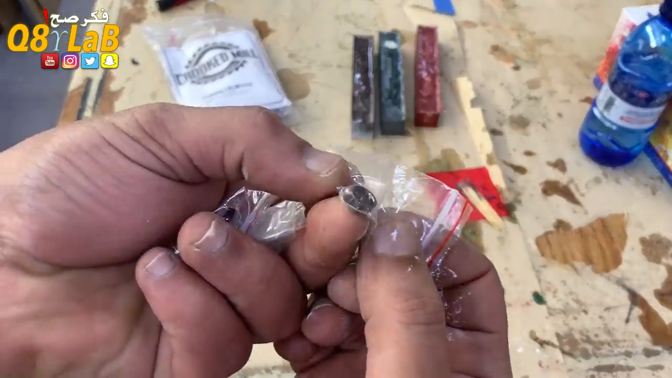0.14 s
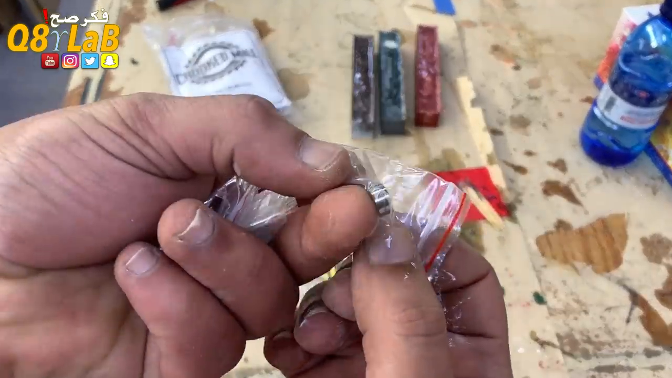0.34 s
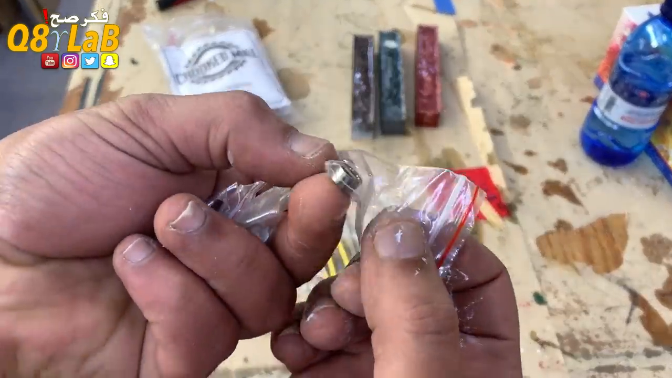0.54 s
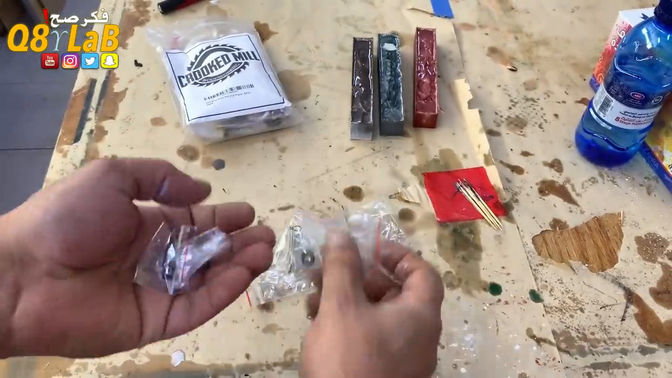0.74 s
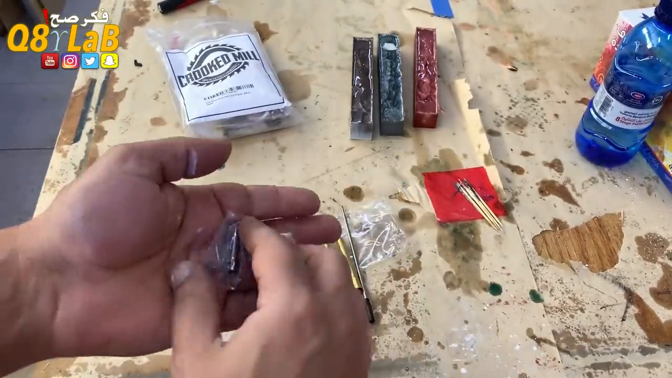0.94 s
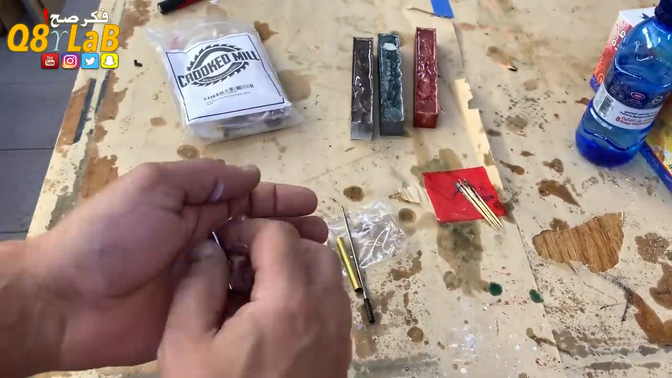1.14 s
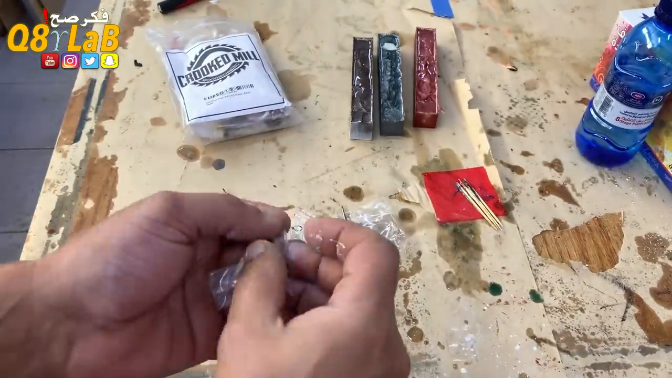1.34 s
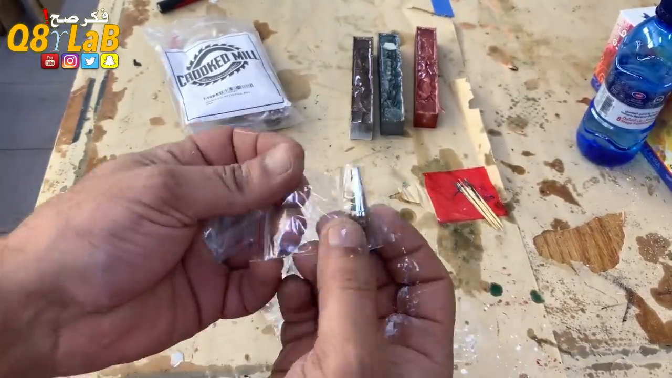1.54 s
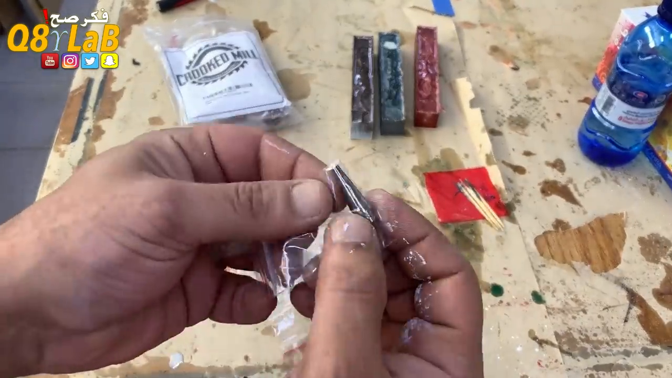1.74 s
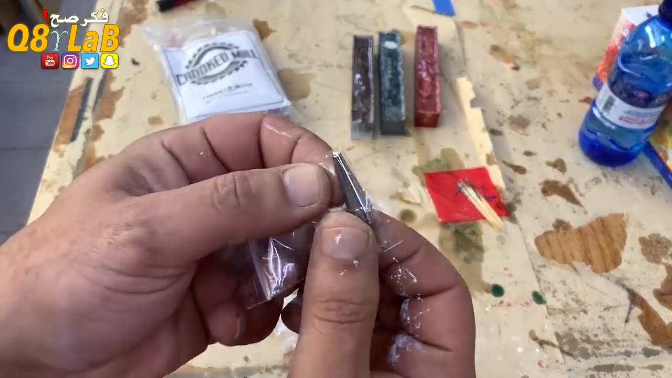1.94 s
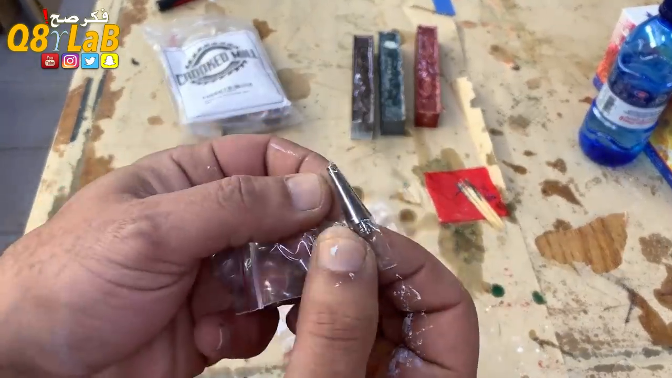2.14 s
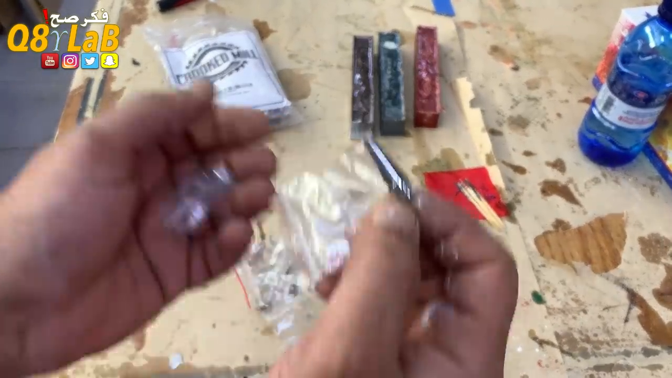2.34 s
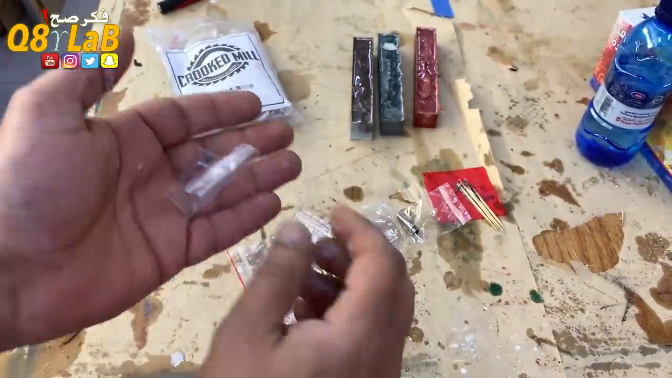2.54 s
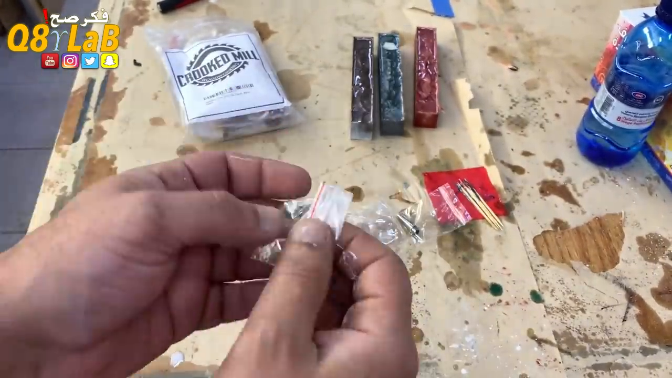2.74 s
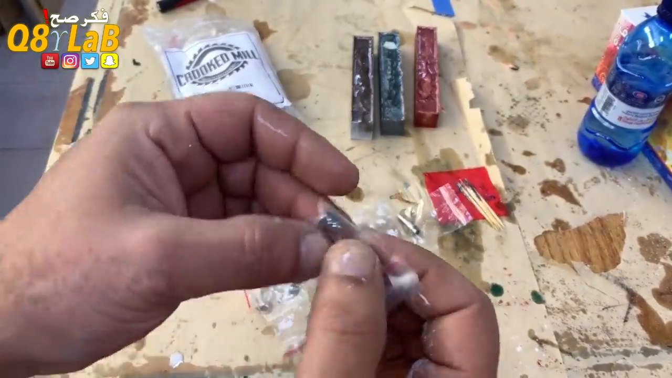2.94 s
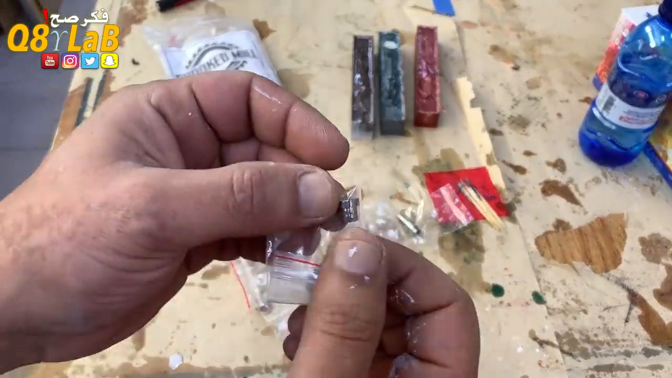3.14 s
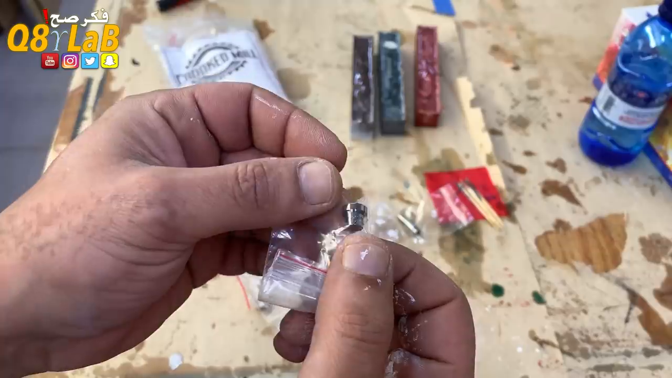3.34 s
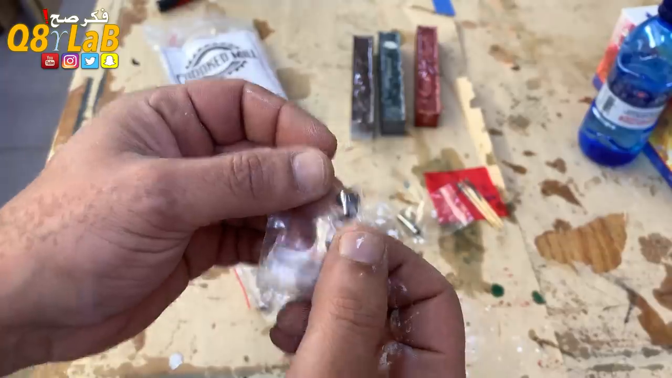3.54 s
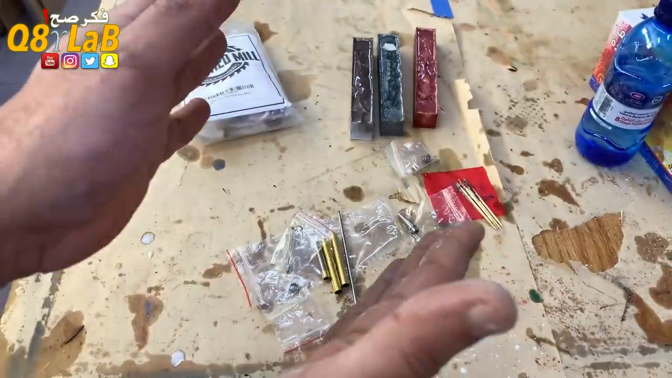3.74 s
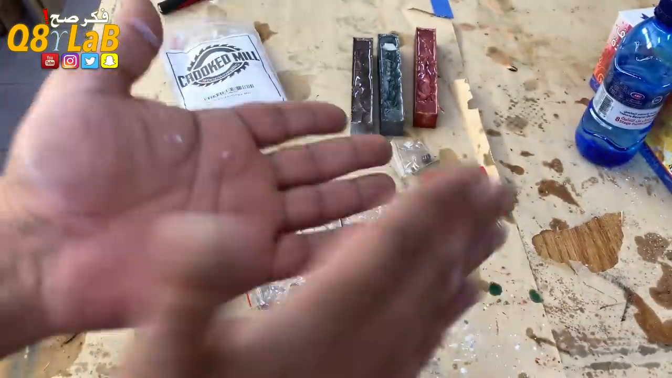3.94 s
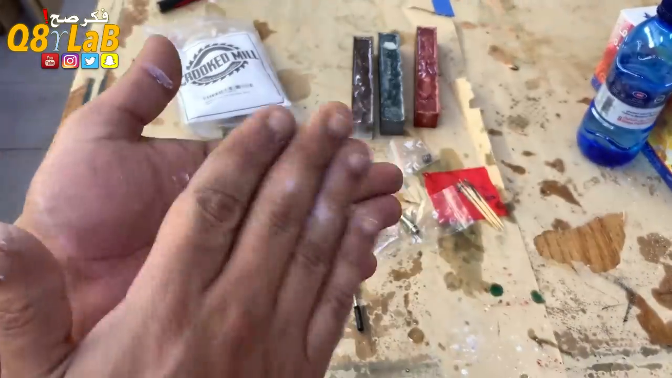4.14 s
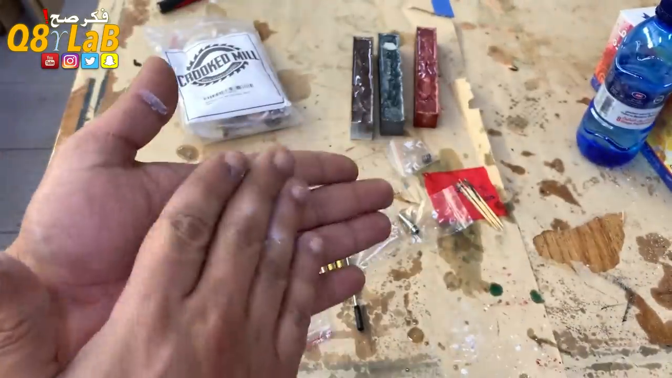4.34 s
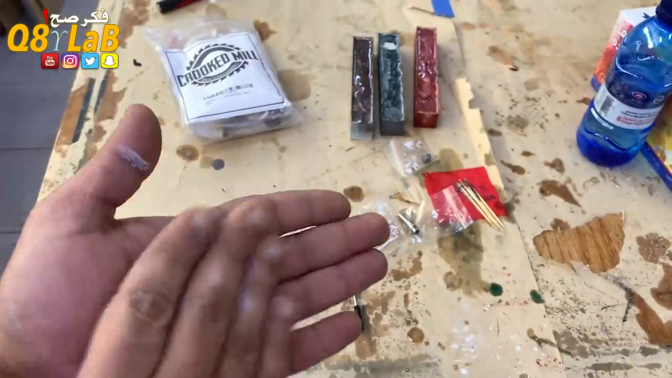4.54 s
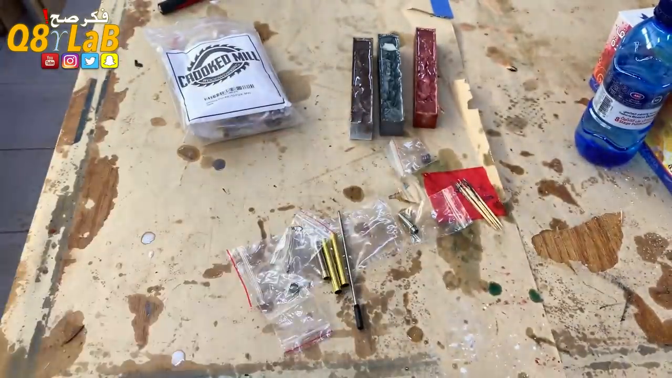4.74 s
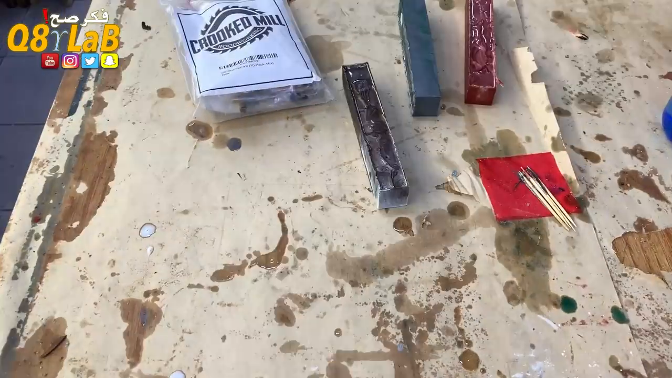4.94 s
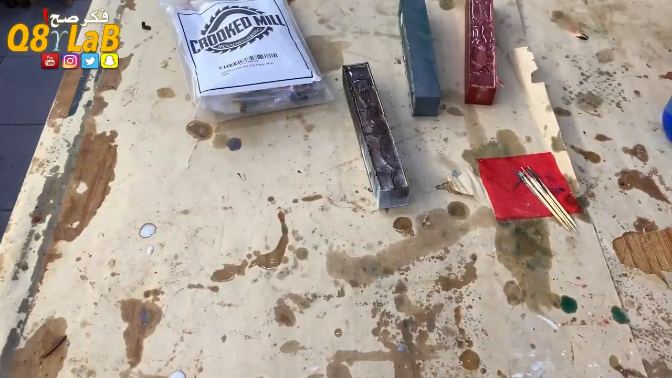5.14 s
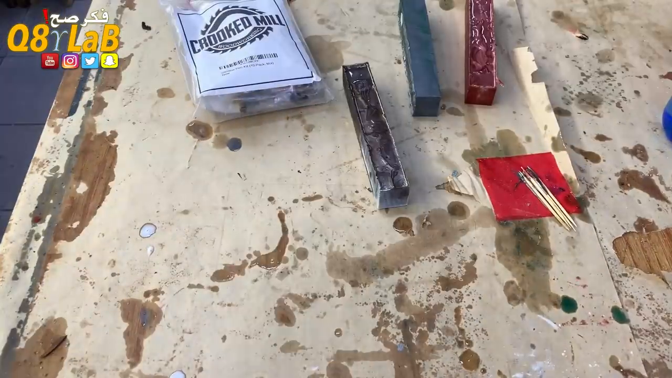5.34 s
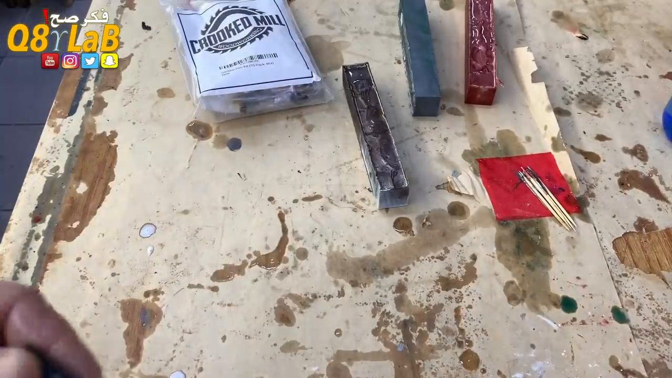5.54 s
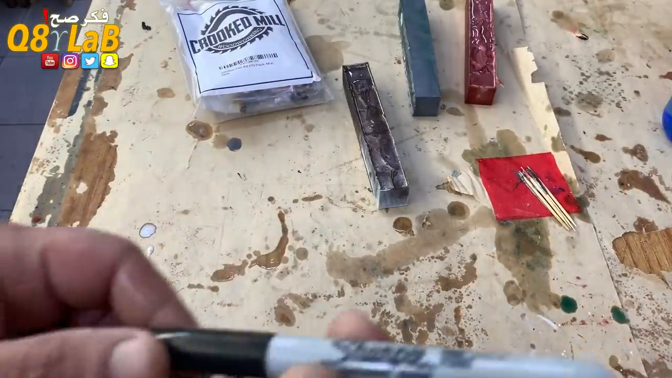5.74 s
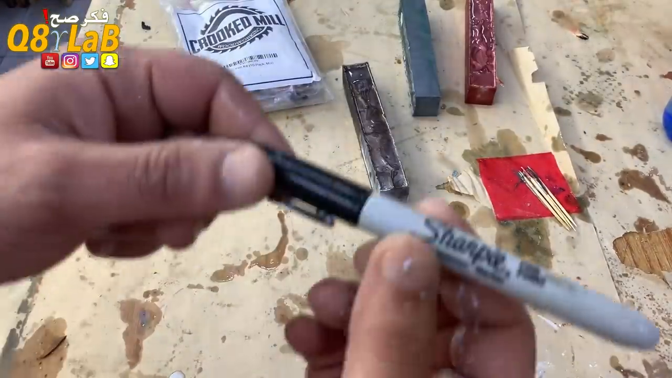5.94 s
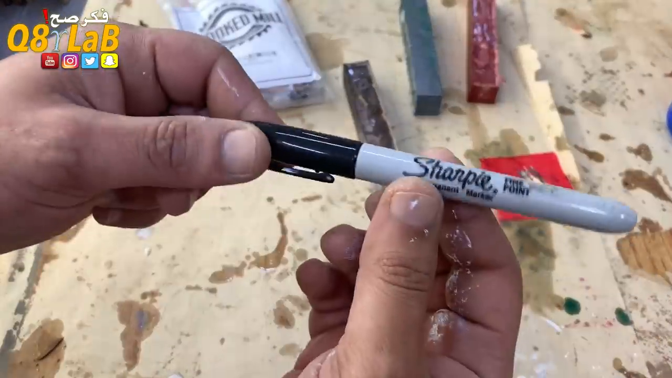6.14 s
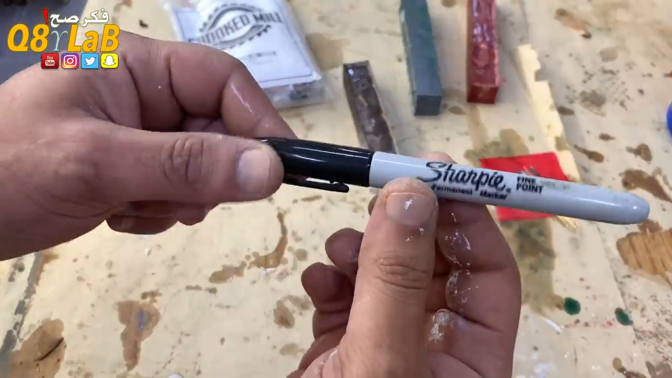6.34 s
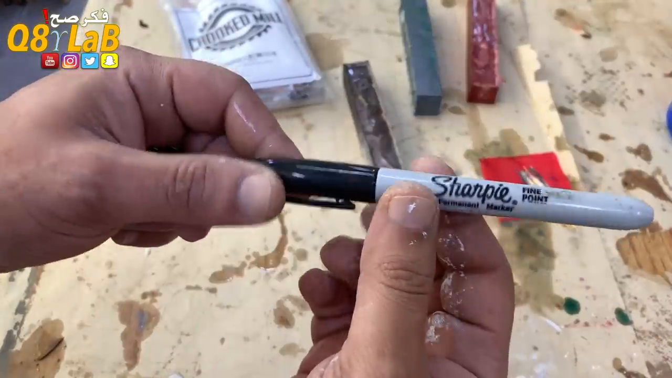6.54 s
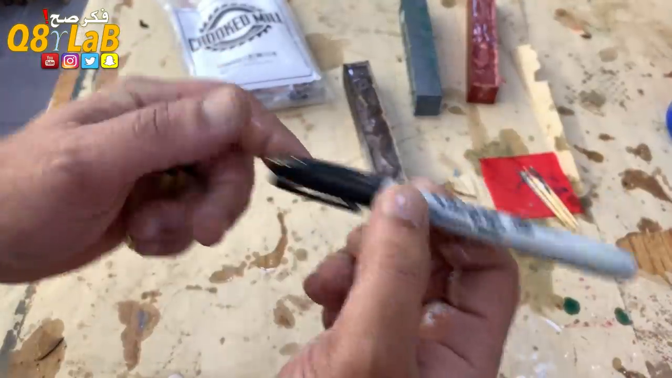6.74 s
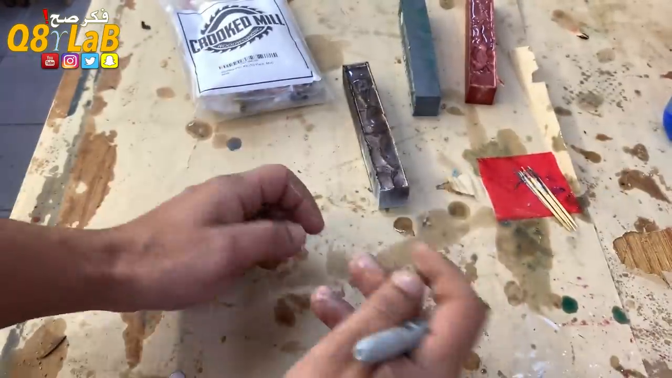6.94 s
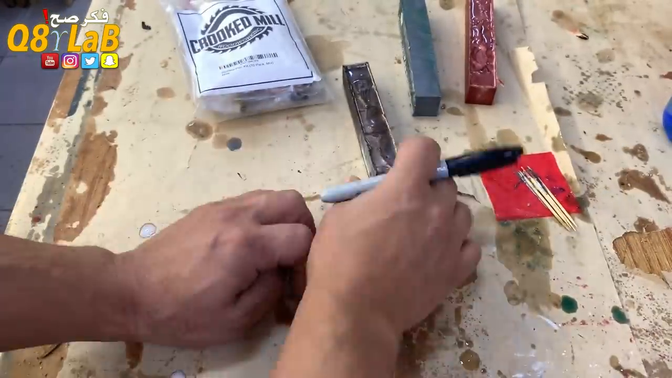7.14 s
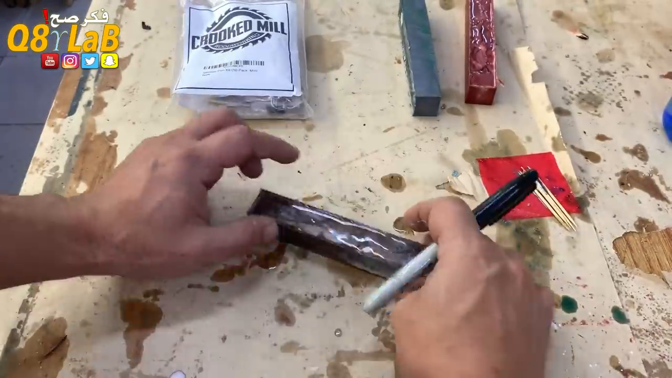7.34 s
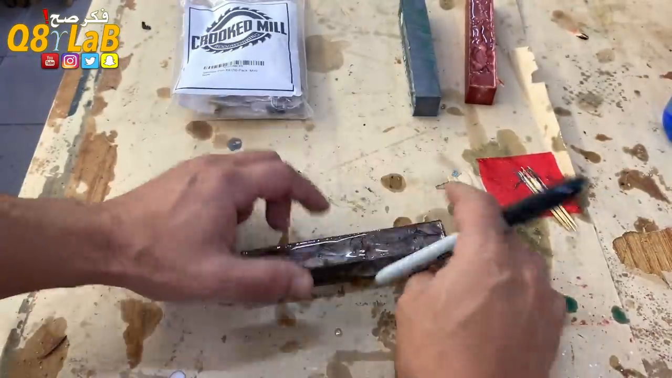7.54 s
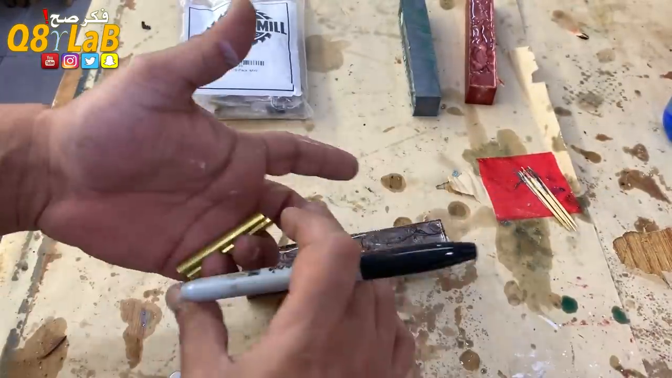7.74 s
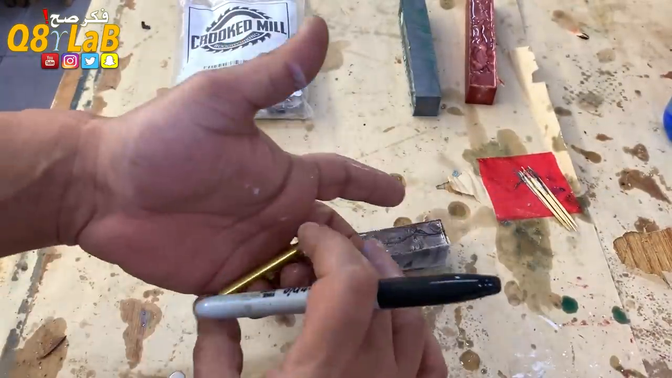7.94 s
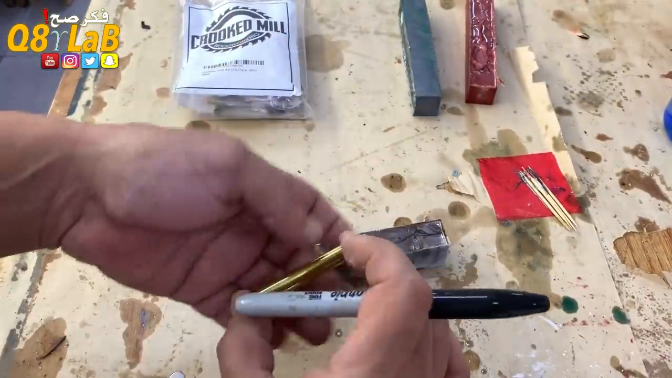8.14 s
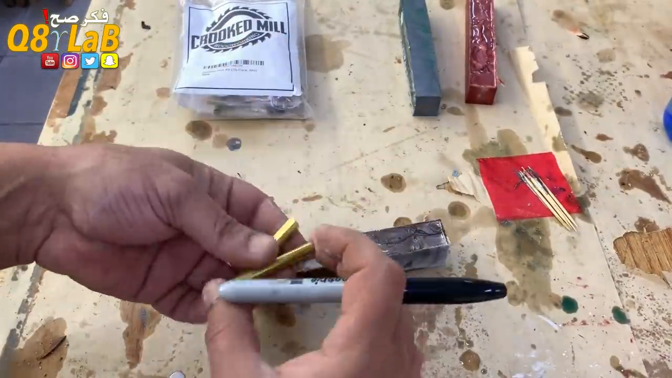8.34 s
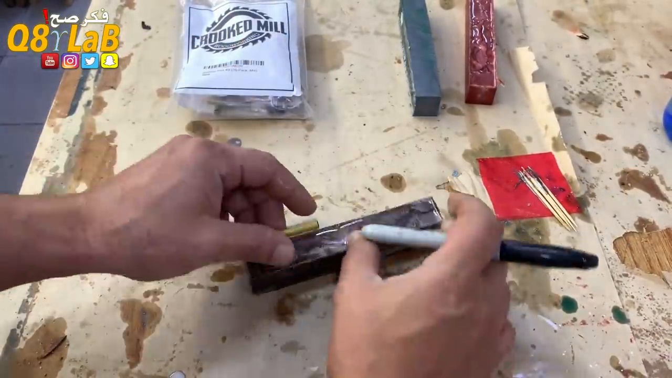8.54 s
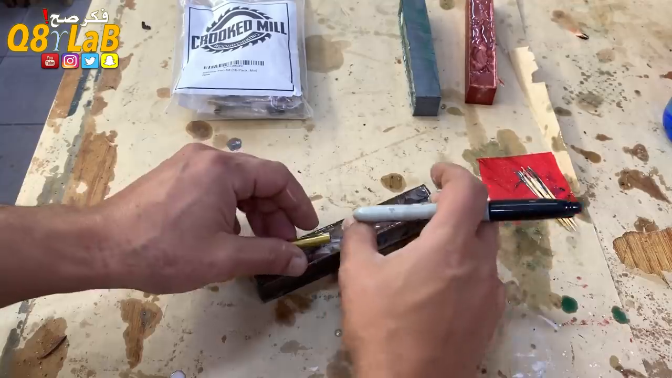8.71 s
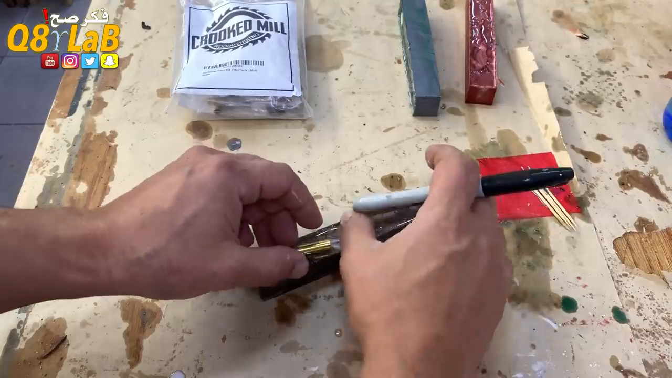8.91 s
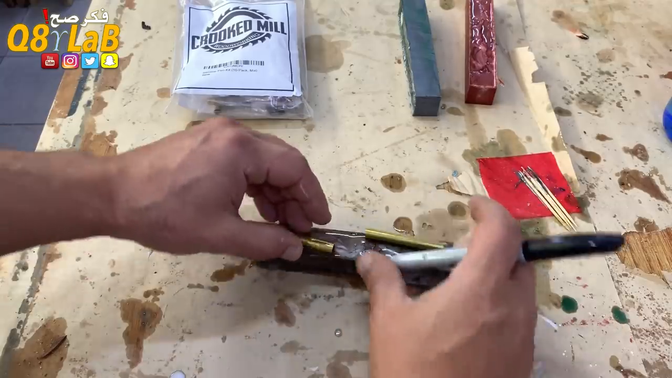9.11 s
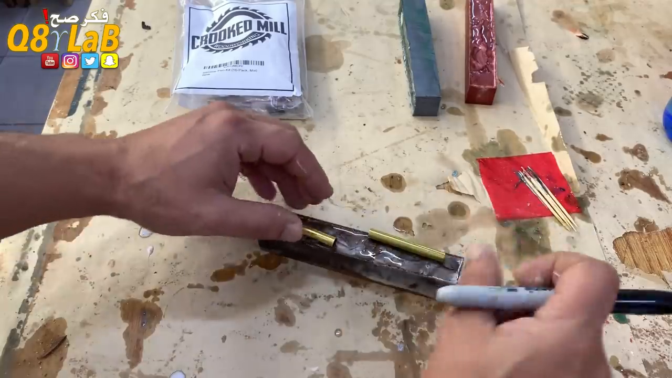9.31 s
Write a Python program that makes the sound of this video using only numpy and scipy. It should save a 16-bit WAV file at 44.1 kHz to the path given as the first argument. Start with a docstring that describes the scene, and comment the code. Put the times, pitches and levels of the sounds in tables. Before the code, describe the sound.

Thin plastic bags crackle close up, parts drop on a wooden bench, palms pat quickly, then a block knocks and brass tubes clink.

```python
"""Small parts on a workshop bench

Close stereo pair at a wooden bench: hands sort plastic bags of pen parts (film snaps over fine crackle),
drop them (noise ticks, ringing wood modes) and pat palms (skin ticks over a falling air tone).
Then a marker, a resin block and brass tubes slide and tap (gritty hiss, slips, short brass modes).
Short reflections and a ventilation rumble surround the bench; at 4.985 s the rumble switches colour and width.
"""
import sys
import numpy as np
from scipy import signal
from scipy.fft import rfft, irfft
from scipy.io import wavfile
from scipy.ndimage import uniform_filter1d

SR = 44100
rng = np.random.default_rng(int(sys.argv[2]) if len(sys.argv) > 2 else 0)


def inscribe(sig):
    """Save sig as 16-bit PCM at rate SR to the path in sys.argv[1].

    A 1-D sig is mono; a 2-D sig holds one channel per row.
    Samples are clipped to [-1, 1] before scaling.
    """
    pcm = np.round(np.clip(np.atleast_2d(sig).T, -1, 1) * 32767)
    wavfile.write(sys.argv[1], SR, pcm.astype(np.int16))


N = 413216

# Levels are set per layer, ahead of bench bounce, microphone pair and reflections; spectra are relative.
# Snaps of plastic film: t of peak/s, nominal level/dB, centre f/Hz
FILM_SNAPS = [(0.02, -47, 4460), (0.0283, -36.5, 4040), (0.1433, -47.5, 10800), (0.1976, -47, 5170),
              (0.231, -45.5, 8000), (0.2732, -45, 8500), (0.2848, -49, 9300), (0.2961, -59, 7750),
              (0.2998, -38.5, 3870), (0.3345, -46, 11700), (0.6583, -43, 9200), (0.735, -51, 10000),
              (0.7504, -42.5, 8600), (0.863, -39, 6600), (0.9197, -49, 8700), (0.9937, -39, 12800),
              (1.072, -42, 11650), (1.1068, -42, 10700), (1.117, -37, 10300), (1.1963, -39.5, 13100),
              (1.2126, -40.5, 11200), (1.2284, -45, 10600), (1.245, -41, 12500), (1.2655, -40, 8500),
              (1.3767, -38.5, 5360), (1.4648, -49, 11000), (1.5008, -51, 8600), (1.528, -38.5, 12400),
              (1.586, -41, 7000), (1.723, -34.5, 4930), (1.791, -39.5, 4250), (1.83, -50, 4900),
              (1.8575, -36.5, 4300), (1.8685, -49, 9100), (1.889, -46, 12700), (1.906, -48, 10600),
              (1.9165, -35, 10700), (1.9228, -45, 11300), (1.9573, -50, 12100), (1.9821, -35, 9500),
              (1.99, -43, 5570), (2.0104, -43, 11600), (2.0263, -43, 10200), (2.0383, -33, 9600),
              (2.0442, -35, 7400), (2.1347, -39.5, 5400), (2.1652, -44, 9500), (2.2032, -38.5, 8700),
              (2.2653, -37.5, 12100), (2.2695, -40, 4930), (2.2797, -48, 6000), (2.3113, -47, 7600),
              (2.3537, -40.5, 3330), (2.3952, -48, 6940), (2.4832, -47, 10200), (2.495, -50, 10000),
              (2.5746, -40, 9600), (2.5845, -40, 6350), (2.7006, -40, 9700), (2.777, -48, 8300),
              (2.886, -41.5, 9700), (2.9371, -56, 13900), (3.002, -38, 7240), (3.1034, -47.5, 5200),
              (3.249, -43.5, 10300), (3.2885, -53, 9300), (3.361, -35, 7060), (3.5017, -53, 8340),
              (3.624, -47.5, 10150), (3.682, -51, 8000)]
# Colour of the fine crackle: f/Hz, level per Hz/dB
FILM_SPECTRUM = [(1470, -37.5), (2500, -15), (2880, 13), (3190, -1.5), (7980, -13.5), (13500, -6),
                 (15500, -12), (16500, -19)]
# How hard the bags are crumpled: t/s, crackle level/dB
CRUMPLE_EFFORT = [(0, -72), (.1, -82.5), (.3, -73.5), (.4, -92), (.62, -91), (.68, -77.5), (.97, -75.5),
                  (1.1, -68.5), (1.42, -66.5), (1.6, -72), (1.67, -82.5), (1.79, -72.5), (2.0, -64.5),
                  (2.08, -77), (2.28, -73.5), (2.45, -78), (2.56, -71.5), (2.65, -88.5), (2.72, -71.5),
                  (3.0, -71), (3.07, -82.5), (3.3, -75), (3.42, -86), (3.6, -86), (3.72, -73)]
# Palms patting together: t/s, tick peak level/dB, slap level/dB, thump level/dB, thump reference f/Hz
PALM_PATS = [(4.1738, -28.5, -27.5, -23.5, 915), (4.2315, -25.5, -28, -24, 840),
             (4.2844, -29.5, -31, -29, 770), (4.3401, -30, -32, -24.5, 696), (4.3973, -36, -30, -25.5, 840),
             (4.4513, -41, -39.5, -34, 950), (4.5082, -46, -38, -37, 706),
             (4.5652, -35.5, -55, -32.5, 1460), (4.6212, -40, -31.5, -24.5, 1160)]
# Blows on the bench: t/s, tick peak level/dB, tick centre f/Hz, rattle peak level/dB, wood level/dB, wood centre f/Hz
BENCH_BLOWS = [(2.5205, -15.5, 13200, -20, -24, 1130), (3.7228, -11.5, 8400, -16, -22.5, 1300),
               (3.7708, -22.5, 5580, -30, -31, 918), (5.1632, -38.5, 7900, -59, -59, 531),
               (5.4036, -51, 10200, -59, -56, 656), (7.0265, -33.5, 6830, -52, -46, 511),
               (7.1076, -32.5, 7260, -57, -50, 653), (7.4829, -34.5, 5070, -51, -41, 590),]
# The block rocking on the bench: t/s, main wood level/dB, centre f/Hz
BLOCK_BUMPS = [(7.25, -35.5, 363), (7.325, -23.5, 684), (7.336, -22, 710), (7.374, -27, 380),
               (7.384, -24.5, 543), (7.391, -18, 444), (7.415, -23, 314), (7.489, -22.5, 616),
               (7.503, -27, 280), (7.582, -26, 350), (7.59, -22.5, 407), (7.884, -38.5, 630),
               (8.574, -30.5, 640), (8.583, -35, 670), (8.594, -25, 398), (8.605, -26, 406),
               (8.64, -33.5, 388), (9.054, -36, 665), (9.099, -29.5, 604), (9.127, -31, 754),
               (9.17, -33, 784), (9.189, -31, 608), (9.2, -29, 733), (9.21, -24.5, 585)]
# Bench top modes: f/Hz, relative level/dB, undamped t60/s
BENCH_MODES = [(228, -10, 0.21), (323.5, -4.5, 0.093), (384, -2.5, 0.08), (497.6, -4.5, 0.052),
               (603.4, 4.5, 0.062), (684, 2.5, 0.057), (789.7, 1, 0.049), (907, -4, 0.095),
               (1002, -0.5, 0.061), (1085, -2.5, 0.053), (1398, -3.5, 0.033), (1635, -11.5, 0.062),
               (1862, -10.5, 0.024), (2260, -9, .03)]
# Rustles of skin and sliding parts: t at full pressure/s, rise/s, hold/s, hiss level/dB
HISS_STROKES = [(5.07, 0.014, .002, -63), (5.164, 0.016, 0.014, -60), (5.27, 0.027, .002, -61),
                (5.505, 0.074, .002, -63.5), (5.661, 0.071, .002, -61), (5.865, .03, .012, -65.5),
                (6.882, 0.053, .002, -74.5), (6.984, 0.064, 0.15, -69), (7.176, 0.01, .11, -60.5),
                (7.293, 0.0062, .05, -54), (7.387, 0.1, .002, -42), (7.478, 0.01, .11, -59),
                (8.589, 0.055, 0.0018, -51), (8.72, 0.011, 0.081, -67.5), (8.868, 0.011, .002, -71),
                (8.929, 0.02, 0.15, -54), (9.101, 0.012, 0.13, -59.5), (9.31, 0.018, .002, -72)]
# Parts dragged on the wood: t at full pressure/s, rise/s, hold/s, low scrape level/dB, high scrape level/dB
WOOD_SLIDES = [(7.292, 0.11, 0.016, -42, -61), (7.336, 0.017, .006, -39.5, -40.5),
               (7.387, 0.017, 0.014, -28, -36), (7.486, 0.012, 0.024, -36, -52),
               (7.578, .011, 0.019, -41, -56), (8.586, 0.019, .002, -34.5, -73),
               (8.924, .03, 0.15, -47, -59.5), (9.124, 0.066, .11, -42.5, -63)]
# Colour of the sliding hiss: f/Hz, level per Hz/dB
SKIN_SPECTRUM = [(880, -46), (1500, -12.5), (2500, 0.5), (2710, -4.5), (5580, -5.5), (8510, -8),
                 (15100, -5.5), (16000, -1), (16500, -27)]
# Faint thin tones: start t/s, end t/s, f/Hz, width f/Hz, level before the fades/dB
THIN_TONES = [(5.7, 5.904, 6900, 403, -85), (5.954, 5.983, 6100, 890, -66)]
# Brass tubes clinking on the block: t/s, tick peak level/dB, wood level/dB
TUBE_CLINKS = [(8.9062, -36, -36), (8.9252, -30.5, -35), (8.9304, -32, -32.5), (8.9364, -39, -34),
               (8.954, -32, -32), (8.976, -33.5, -31.5), (8.994, -36, -35.5), (9.0094, -39, -35),
               (9.0246, -45, -42), (9.0573, -43, -38)]
# Brass tube modes: f/Hz, relative level/dB, t60 of a tube left free/s
BRASS_MODES = [(2340, -11, 0.15), (2500, -2.5, 0.2), (5100, 0, .06), (6900, -19, 0.06), (8800, -5, 0.058),
               (9200, 2, .06), (10400, -7, 0.042)]
# Side signal against mid at the microphone pair: f/Hz, level/dB
SIDE_LEVEL = [(60, -17), (130, -19.5), (290, -25.5), (640, -15), (1410, -8), (3100, -1.5), (6820, 6),
              (15000, 3)]
# Left microphone over right: f/Hz, level/dB
LEFT_TILT = [(60, -2.5), (150, -1.7), (380, -0.5), (950, 1), (2380, 2.5), (5980, 2.4), (15000, 0.0)]
# Room rumble, one spectrum before the switch and one after: f/Hz, level per Hz/dB
RUMBLE_SPECTRA = ([(20, -29.5), (91, -3.5), (143, -11), (184, 0.5), (212, -8.5), (305, -2.5), (440, -8),
                  (750, -3.5), (1240, -10.5), (1840, -22), (3620, -27), (5500, -40), (7500, -48),
                  (12000, -50), (15600, -51), (16500, -67.5)], [(20, -12), (48, -9.5), (108, -2.5),
                  (260, -11), (342, -4), (480, -7), (670, -9.5), (860, -14.5), (1050, -22.5), (1700, -26.5),
                  (3100, -37.5), (4400, -50), (7000, -51.5), (12500, -55), (15500, -52), (16500, -68)])
# Left-right likeness of the rumble, before the switch and after: f/Hz, correlation (1 = alike)
RUMBLE_LIKENESS = ([(60, 1), (180, 0.88), (550, 0.99), (1650, 0.644), (4970, 0.2), (15000, 0.09)],
                    [(60, 0.95), (180, 0.96), (550, 0.93), (1650, 0.16), (4970, 0.022), (15000, 0.06)])
# Wavering hum lines: start t/s, end t/s, f/Hz, width f/Hz, level/dB
HUM_LINES = [(0, 4.985, 183.1, 14, -60), (0, 4.985, 104, 12, -64), (4.985, 9.37, 103, 14, -64),
             (4.985, 9.37, 59, 21, -65)]

RUMBLE_SWITCH_S = 4.985
RUMBLE_LEVELS_DB = -49, -49.5  # rms before and after the switch
TICK_RISE_S = .0012  # a tick swells this long before its peak
LESSER_ABOVE_DB, LESSER_SPREAD_DB = 22, 9  # loudest lesser snap over the crackle, and range below it
LESSER_LOW_HZ, LESSER_HIGH_HZ = 7500, 14030
THUMP_CYCLES = 15  # the trapped air dies by 60 dB in this many periods of its reference pitch
ENTRY_DB = -16.5  # a sliding contact starts this far under its full level
HISS_FALL_DB_PER_S, LOW_FALL_DB_PER_S, HIGH_FALL_DB_PER_S = 336, 233, 407
BRASS_RING_DB, BRASS_HELD_T60_S = -5, .012  # fingers stop the ring early
BOUNCE_S, BOUNCE_DB = .000217, -11.5  # the bench top mirrors the bags just below them
RECORDER_EDGE_HZ = 15950


def bags(lesser_count=85):
    """Large snaps of the film over a shower of tiny ones that follows the crumpling."""
    t = np.arange(N) / SR
    times, levels = np.transpose(CRUMPLE_EFFORT)
    effort = gain_of(np.interp(t, times, levels)) * (t < times[-1])

    clumps = rng.exponential(1, N // 500 + 1).repeat(500)[:N]  # creases give way in bursts
    fires = rng.random(N) < clumps * 900 / SR
    size = gain_of(5.4 * np.minimum(rng.exponential(1, N), 3)) * fires
    crackle = size * rng.standard_normal(N) + 0.11 * rng.standard_normal(N)
    out = effort * patchy(coloured(crackle, FILM_SPECTRUM), 4.0)

    # lesser snaps fall by chance, thickest and loudest where the crumpling is hardest
    share = np.cumsum(effort[::100]) / effort[::100].sum()
    for when, weakness, pitch in rng.random((lesser_count, 3)):
        at = np.searchsorted(share, when) * 100 / SR
        db = np.interp(at, times, levels) + LESSER_ABOVE_DB - LESSER_SPREAD_DB * weakness
        add(out, at, snap(db, LESSER_LOW_HZ + (LESSER_HIGH_HZ - LESSER_LOW_HZ) * pitch))
    for s, db, hz in FILM_SNAPS:
        add(out, s - TICK_RISE_S, snap(db, hz))
    return out


def snap(db, hz):
    """One crease gives way: a click, a faint tail, and a fixed, very short treble hump."""
    click = tick(db + 3.5, hz, 0.002, sharp=0.75, tone=0.49)
    tail = tick(db - 11.0, hz, 0.063, sharp=0.7, tone=0.28)
    treble = tick(db - 0.1, 16000, 0.0011, sharp=0.12, tone=0.28)
    return click + tail + treble


def bounced(x):
    """Adds the delayed, weaker reflection from the bench top."""
    hz = np.fft.rfftfreq(N, 1 / SR)
    reflection = gain_of(BOUNCE_DB) * np.exp(-2j * np.pi * hz * BOUNCE_S)
    return irfft(rfft(x) * (1 + reflection), N)


def palms():
    """Skin tick and slap, then trapped air that drops in pitch as the palms close."""
    out, t = np.zeros(N), np.arange(1500) / SR
    for s, db, slap_db, thump_db, hz in PALM_PATS:
        glide_hz = hz * (0.27 + 1.51 * np.exp(-t / 0.0011))
        decay = gain_of(-60 * t * hz / THUMP_CYCLES)
        thump = np.sin(2 * np.pi * np.cumsum(glide_hz) / SR) * decay
        add(out, s, tick(db, 14400, 0.0014, sharp=0.12, tone=0.82))
        add(out, s, tick(db - 11.5, 4800, 0.061, sharp=0.15, tone=0.66))
        add(out, s + 0.00041, tick(slap_db, 3150, 0.005, sharp=0.35, tone=1.0))
        add(out, s + 0.0017, gain_of(thump_db) * thump)
    return out


def blows():
    """Tick, a rattling tail of loose parts and the wood answering just after; the rocking block rings wood alone."""
    out = np.zeros(N)
    for s, db, hz, rattle_db, wood_db, wood_hz in BENCH_BLOWS:
        add(out, s, tick(db, hz, 0.0069))
        add(out, s, tick(rattle_db, hz, 0.081, sharp=1.2, tone=0.12))
        add(out, s + 0.0016, gain_of(wood_db) * wood(wood_hz, 0.23, spread=0.38))
    for s, db, hz in BLOCK_BUMPS:
        body = wood(hz, 1.8, spread=0.24, damp=1.42)
        upper = gain_of(-19) * wood(1600, 0.73, spread=0.37, damp=1.45)
        add(out, s, gain_of(db) * (body + upper))
    return out


def wood(hz, rise_ms, spread=.55, damp=1):
    """Bench modes near hz ring, phase and size of each drawn at random; a part left lying damps them."""
    f, db, t60 = np.transpose(BENCH_MODES)[:, :, None]
    t, draw = np.arange(6000) / SR, rng.standard_normal((len(BENCH_MODES), 2, 1))
    nearness = np.exp(-.5 * (np.log(f / hz) / spread) ** 2)  # spread is in log frequency
    size = nearness * gain_of(db + 0.78 * draw[:, 0])
    decay = gain_of(-60 * damp * t / t60)
    ring = (size * decay * np.sin(2 * np.pi * f * t + .8 * draw[:, 1])).sum(0)
    ring *= 1 - np.exp(-t * 1000 / rise_ms)
    return ring / abs(ring).max()


def tick(db, hz, t60, sharp=0.081, tone=0.11):
    """A short noise burst: tone mixes in a hump at hz, of width sharp * hz, against wide noise."""
    t = np.arange(4000) / SR
    noise = signal.lfilter([1, -1], [1, -.75], rng.standard_normal(len(t)))  # bass removed
    swell = np.minimum(t / TICK_RISE_S, 1) ** 9.9
    decay = gain_of(-60 * np.maximum(t - TICK_RISE_S, 0) / t60)
    hump = evened(band(noise, hz, hz * sharp))
    burst = (tone * hump + (1 - tone) * evened(noise)) * swell * decay
    return gain_of(db) * burst / abs(burst).max()


def slides():
    """Rough contact: a gritty hiss, slips that ring low and high bench modes, and faint thin tones."""
    grit = rng.standard_normal(N) * gain_of(2.0 * rng.exponential(1, N // 40 + 1).repeat(40)[:N])
    grit *= gain_of(1.14 * rng.exponential(1, N // 220 + 1).repeat(220)[:N])  # the grip catches and lets go
    hiss = patchy(coloured(grit, SKIN_SPECTRUM), 2.16)
    low = scrape(370, 0.48, 0.56, 150)
    high = scrape(1700, 0.39, 0.3, 150)

    hiss_gain, low_gain, high_gain = np.zeros((3, N))
    for row in HISS_STROKES:
        add(hiss_gain, *contact(*row, HISS_FALL_DB_PER_S))
    for s, rise_s, hold_s, low_db, high_db in WOOD_SLIDES:
        add(low_gain, *contact(s, rise_s, hold_s, low_db, LOW_FALL_DB_PER_S))
        add(high_gain, *contact(s, rise_s, hold_s, high_db, HIGH_FALL_DB_PER_S))
    out = hiss_gain * hiss + low_gain * low + high_gain * high

    for start, end, hz, width, db in THIN_TONES:
        count = round((end - start) * SR)
        thin = evened(band(rng.standard_normal(count), hz, width))
        add(out, start, gain_of(db) * thin * signal.windows.tukey(count, .4))
    return out


def scrape(hz, rise_ms, spread, slips_per_s):
    """Four streams of irregular slips, each at the given rate and with its own random ring of the bench."""
    slips = rng.standard_normal((4, N)) * (rng.random((4, N)) < slips_per_s / SR)
    return evened(sum(signal.oaconvolve(row, wood(hz, rise_ms, spread))[:N] for row in slips))


def contact(s, rise_s, hold_s, db, fall_db_per_s):
    """Start time and gain of one contact: it swells, holds, and fades at a steady dB rate."""
    t = np.arange(-rise_s, hold_s + 0.18, 1 / SR)  # 0 at full pressure
    entry_db = ENTRY_DB * np.maximum(-t / rise_s, 0)
    fall_db = fall_db_per_s * np.maximum(t - hold_s, 0)
    return s + t[0], gain_of(db + entry_db - fall_db)


def tubes():
    """Each clink: a bright tick, the held tube ringing briefly, and the wood below."""
    out, t = np.zeros(N), np.arange(2000) / SR
    f, mode_db, t60 = np.transpose(BRASS_MODES)[:, :, None]
    decay_db = -60 * t * (1 / t60 + 1 / BRASS_HELD_T60_S)
    for s, db, wood_db in TUBE_CLINKS:
        draw = rng.standard_normal((len(BRASS_MODES), 2, 1))  # random size and phase of each mode
        size = gain_of(mode_db + 3.0 * draw[:, 0] + decay_db)
        ring = (size * np.sin(2 * np.pi * (f * t + draw[:, 1]))).sum(0)
        add(out, s + TICK_RISE_S, gain_of(db + BRASS_RING_DB) * ring / abs(ring).max())
        add(out, s, tick(db, 9100, 0.0049, sharp=0.27, tone=0.69))
        add(out, s, tick(db - 26, 9000, 0.054, sharp=1.2, tone=0.35))
        add(out, s + 0.00162, gain_of(wood_db) * wood(790, 0.23, spread=0.55, damp=1.6))
    return out


def microphone_pair(x):
    """Stereo width: randomly smeared copies, faded in turn, make left and right differ in the treble."""
    hz, t, unlike = np.fft.rfftfreq(N, 1 / SR), np.arange(N) / SR, 0
    for k in range(3):
        # a quarter turn of phase in the bass, random lags above it
        wander = rng.standard_normal(129) * np.clip(np.arange(129) / 14 - 1, 0, 1)
        lag = np.pi / 2 + np.cumsum(wander) * 0.84
        smear = np.fft.fftshift(irfft(np.exp(1j * lag)))
        turn = np.sqrt(2 / 3) * np.cos(np.pi * (t * 23 + k / 3))
        unlike = unlike + turn * signal.oaconvolve(x * turn, smear, "same")
    sign = np.array([[1], [-1]])  # left, right
    side = sign * rfft(unlike) * gain_of(read(SIDE_LEVEL, hz))
    tilt = gain_of(sign * read(LEFT_TILT, hz) / 2)
    return irfft((rfft(x) + side) * tilt, N)


def workshop(x, t60=0.049):
    """Sparse reflections of random sign, different at each microphone."""
    taps = np.zeros((2, 12000))
    at = np.arange(60, 11970, 20) + rng.integers(0, 20, (2, 596))
    np.put_along_axis(taps, at, rng.choice([-1., 1.], at.shape), 1)
    taps *= gain_of(-60 * np.arange(12000) / SR / t60)
    both = taps.mean(0)  # long waves reach both microphones alike
    taps = both + signal.lfilter(*signal.butter(2, 1100, "high", fs=SR), taps - both)
    return signal.oaconvolve(x[None], taps / np.linalg.norm(taps[0]), axes=1)[:, :N]


def rumble():
    """Ventilation as patchy noise whose colour and width switch once, with narrow wavering hum lines."""
    frames, hz = N // 512 + 5, np.fft.rfftfreq(2048, 1 / SR)
    a, b, c, d, patches = rng.standard_normal((frames, 1025, 5)).T
    patches = evened(uniform_filter1d(uniform_filter1d(patches, 14, 0), 5, 1))
    left, other = a + 1j * b, c + 1j * d
    tilt_db = np.outer([.5, -.5], read(LEFT_TILT, hz))[:, :, None]

    out, t = np.zeros((2, N)), np.arange(N) / SR
    spans = t < RUMBLE_SWITCH_S, t >= RUMBLE_SWITCH_S
    for spectrum, db, likeness, on in zip(RUMBLE_SPECTRA, RUMBLE_LEVELS_DB, RUMBLE_LIKENESS, spans):
        same = np.clip(read(likeness, hz), -1, 1)[:, None]
        right = same * left + np.sqrt(1 - same ** 2) * other
        colour_db = read(spectrum, hz)[:, None] + 1.7 * patches + tilt_db
        z = np.array([left, right]) * gain_of(colour_db)
        noise = signal.istft(z, nperseg=2048, noverlap=1536)[1][:, :N]
        out += on * gain_of(db) * evened(noise)
    for start, end, f, width, db in HUM_LINES:
        line = band(band(rng.standard_normal(N), f, width), f, width)
        out += (t >= start) * (t < end) * gain_of(db) * evened(line)
    return out


def gain_of(db):
    """Decibels to a factor."""
    return 10 ** (np.asarray(db) / 20)


def evened(x):
    """Scales to rms 1."""
    return x / np.sqrt(np.mean(x ** 2) + 1e-20)


def read(points, hz):
    """Reads a spectrum table on a log-frequency axis."""
    f, value = np.transpose(points)
    return np.interp(np.log(hz + 1), np.log(f + 1), value)


def add(mix, s, sound):
    """Mixes a sound in at time s."""
    part = mix[max(round(s * SR), 0):][:len(sound)]
    part += sound[:len(part)]


def coloured(x, points):
    """Filters x by the spectrum of a table, rms 1."""
    gain = gain_of(read(points, np.fft.rfftfreq(len(x), 1 / SR)))
    return evened(irfft(rfft(x) * gain, len(x)))


def band(x, hz, width):
    """One resonance of gain 1."""
    return signal.lfilter(*signal.iirpeak(hz, hz / width, SR), x)


def patchy(x, spread_db):
    """Lets the colour drift: random patches of level across time and pitch, rms 1."""
    z = signal.stft(x, nperseg=256)[2]
    patches = uniform_filter1d(uniform_filter1d(rng.standard_normal(z.shape), 12, 0), 6, 1)
    return evened(signal.istft(z * gain_of(spread_db * evened(patches)), nperseg=256)[1][:N])


def scene():
    """Bench sounds at the microphones, their reflections and the rumble."""
    near = bounced(bags()) + palms() + blows() + slides() + tubes()
    return microphone_pair(near) + gain_of(-8.5) * workshop(near) + rumble()


def record(dry):
    """The band limit of the recorder, a steep low-pass."""
    low_pass = signal.firwin(161, RECORDER_EDGE_HZ, window=("kaiser", 9), fs=SR)
    return signal.oaconvolve(dry, low_pass[None], "same")


dry = scene()
out = record(dry)
inscribe(out)
```